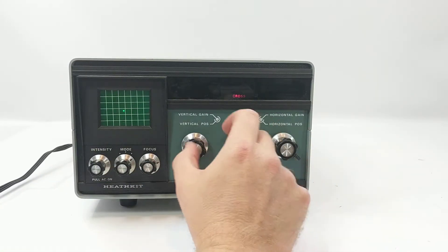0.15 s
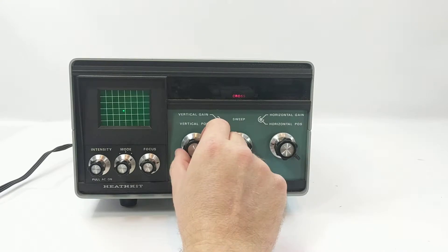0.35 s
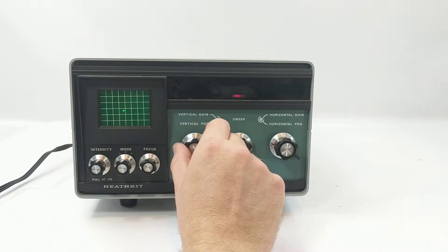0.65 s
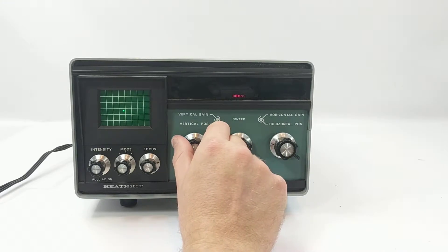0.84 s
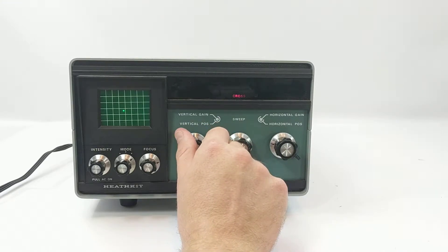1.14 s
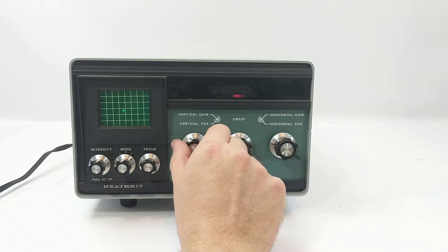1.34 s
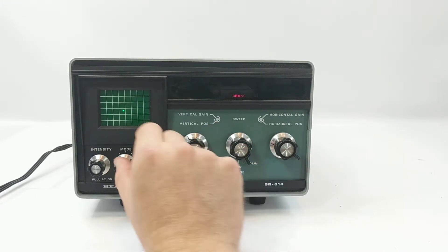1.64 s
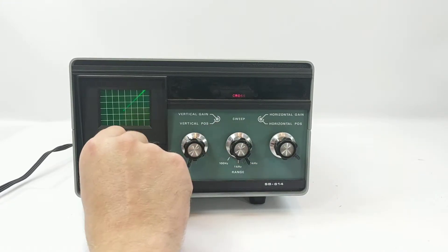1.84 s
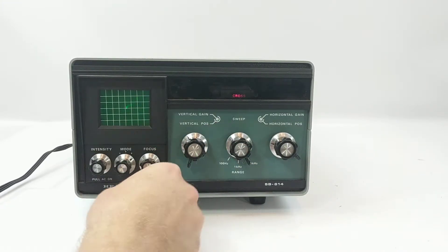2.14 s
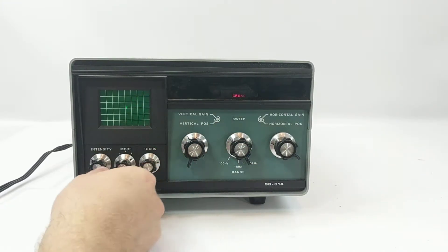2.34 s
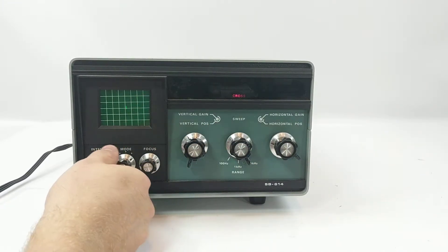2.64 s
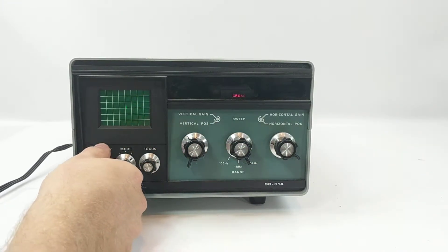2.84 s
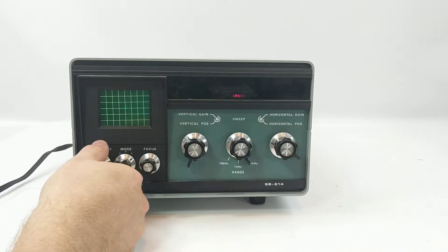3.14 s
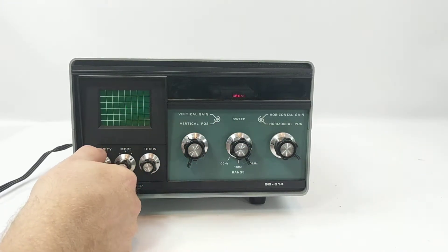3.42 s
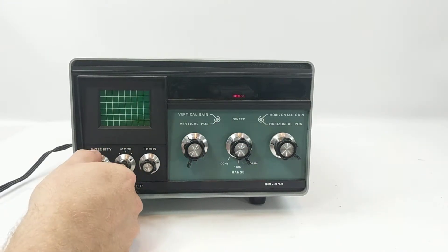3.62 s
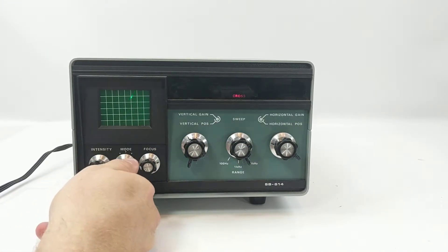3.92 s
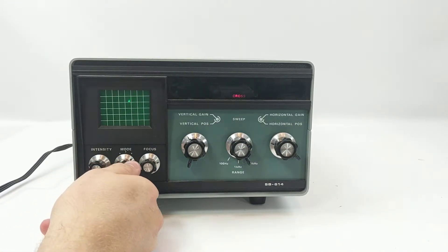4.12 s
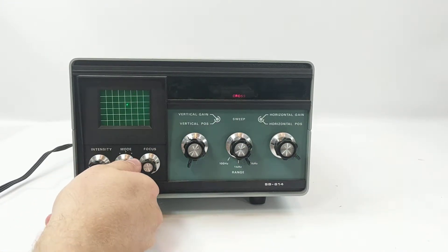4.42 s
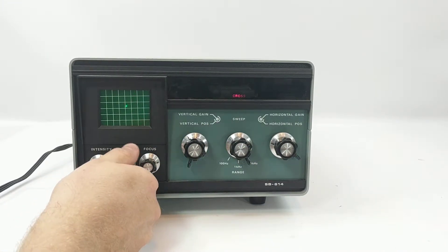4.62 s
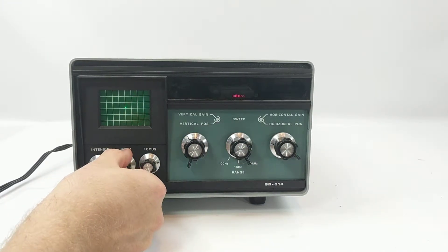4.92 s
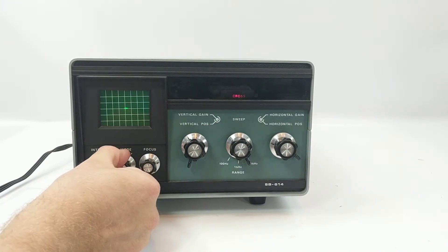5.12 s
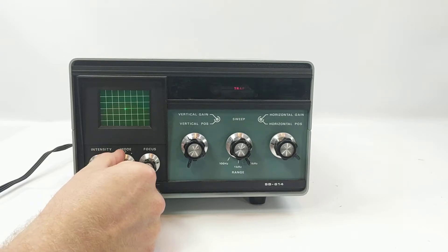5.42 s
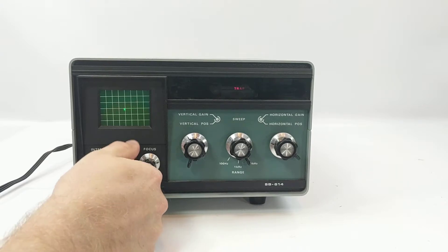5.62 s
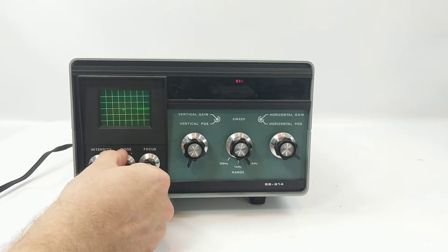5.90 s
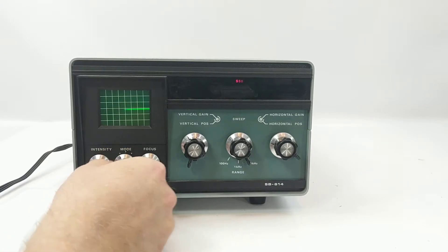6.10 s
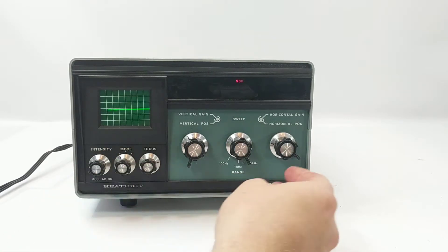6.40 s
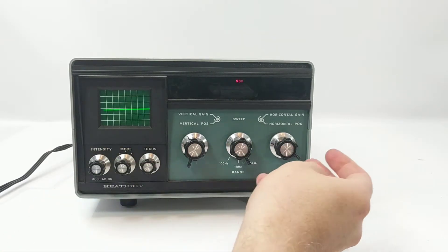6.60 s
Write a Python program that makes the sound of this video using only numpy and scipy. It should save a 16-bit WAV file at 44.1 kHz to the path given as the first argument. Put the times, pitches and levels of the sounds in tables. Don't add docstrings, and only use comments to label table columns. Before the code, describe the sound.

Close to a phone microphone in a quiet room, a hand works the rotary switches of a steel-cased bench instrument. Light fingertip rubs and tiny knocks lead to a very loud midrange snap, then more taps and a brighter, crisp snap. Two softer, duller clunks follow close together near the end. Each click bounces briefly and rings the case, over low rumble and faint air hiss.

```python
import sys
import numpy as np
from scipy import signal
from scipy.fft import rfft, irfft, next_fast_len
from scipy.io import wavfile
from scipy.ndimage import uniform_filter1d

SR = 44100
rng = np.random.default_rng(int(sys.argv[2]) if len(sys.argv) > 2 else 0)


def elevation(decibels):
    levels = np.asarray(decibels, float)
    return 10 ** (levels / 20)


def file_out(sig):
    cols = np.atleast_2d(sig).T
    lim = np.clip(cols, -1, 1)
    pcm = np.round(lim * 32767).astype(np.int16)
    wavfile.write(sys.argv[1], SR, pcm)


N = 297895

# f/Hz, density/(dB per Hz)
RUB = [(300, -22.5), (1000, -4), (2500, -3), (3800, 3), (6500, -7.5), (8800, -9.5), (11000, -5),
       (15500, -14.5), (16200, -34)]


def curve(hz, table, column=1):
    table = np.array(table, float)
    return np.interp(np.log(np.maximum(hz, 1)), np.log(table[:, 0]), table[:, column])


def unit(x):
    return x / np.sqrt(np.mean(x ** 2))


def coloured(table, size):
    hz = np.arange(size // 2 + 1) * SR / size
    white = rfft(rng.standard_normal(size))
    return unit(irfft(white * elevation(curve(hz, table)), size))


def steady_noise(table):
    return coloured(table, next_fast_len(N))[:N]


def walk(rate):
    k = int(SR / rate)
    held = np.repeat(rng.standard_normal(N // k + 1), k)[:N]
    return unit(uniform_filter1d(uniform_filter1d(held, k), k))


def fade(t, t60):
    return elevation(-60 * t / t60)


def modes(table, t, rise_s, spread=1):
    hz, db, t60 = np.array(table, float).T[:, :, None]
    phase = 2 * np.pi * (hz * t + spread * rng.random((len(hz), 1)))
    ringing = elevation(db) * fade(t, np.clip(t60, .02, .33)) * np.sin(phase)
    return ringing.sum(0) * (1 - np.exp(-t / rise_s))


def clatter(colour, t, share, echo_db):
    # f/Hz, ring t60/s, room t60/s, room level/dB
    decays = [(200, 0.067, 0.53, -4.5), (500, 0.082, 0.41, -11.5), (980, 0.05, 0.24, -13.5),
              (2000, 0.055, 0.21, -14), (5030, 0.06, 0.21, -12.5), (12000, 0.042, 0.14, -12.5)]
    bands_hz = 130 * 2 ** (np.arange(15) / 2)
    hz = np.arange(len(t) // 2 + 1) * SR / len(t)
    place = 2 * np.log2(np.maximum(hz, 1) / bands_hz[:, None])
    bands = irfft(rfft(coloured(colour, len(t))) * np.clip(1 - abs(place), 0, 1), len(t))
    ring_t60, room_t60, room_db = (curve(bands_hz, decays, column=c)[:, None] for c in (1, 2, 3))
    rise = 1 - np.exp(-t * bands_hz[:, None] / 1.3)
    room = elevation(room_db + echo_db) * fade(t, room_t60) * (1 - np.exp(-t / 0.024))
    return (bands * rise * (fade(t, share * ring_t60) + room)).sum(0)


def add(out, x, s):
    i = int(s * SR)
    out[i:i + len(x)] += x[:len(out) - i]


def room_air():
    # f/Hz, density/(dB per Hz)
    air_colour = [(40, -27), (75, 4), (125, 3), (155, -5.5), (300, -10), (390, -8.5), (480, -4.5),
                  (630, -10.5), (2500, -21.5), (3800, -18), (6300, -26.5), (8800, -32.5), (12000, -25),
                  (15800, -28.5)]
    return elevation(-68 + 0.35 * walk(3.9)) * steady_noise(air_colour)


def rumble():
    # f/Hz, density/(dB per Hz)
    rumble_colour = [(20, -23.5), (33, -10.5), (45, 2.5), (58, 1.5), (75, -13), (100, -46)]
    swells = [
        (.28, 0.23, -73),
        (.85, .4, -81),
        (1.3, 0.37, -80),
        (1.852, 0.32, -75.5),
        (2.35, 0.92, -79),
        (3.6, .4, -74),
        (4.12, 0.93, -70.5),
        (4.852, 0.71, -73),
        (5.7, 0.27, -76),
        (6.6, .4, -77.5),
    ]
    t = np.arange(N) / SR
    swell = 0
    for centre, length, db in swells:
        swell = swell + elevation(db) * np.cos(np.pi * np.clip((t - centre) / length, -.5, .5)) ** 2
    return (elevation(-78.5 + 1.5 * walk(3.2)) + swell) * steady_noise(rumble_colour)


def stir():
    return elevation(-84 + 4.5 * walk(2.5)) * steady_noise(RUB)


def hum():
    return elevation(-84) * steady_noise([(325, -38.5), (336, -1.5), (352, 0.5), (363, -40.5)])


def supply_whines():
    # t/s, f/Hz
    whine_path = [(0, 6130), (1.5, 6100), (2.1, 6040), (3.3, 5870), (4.5, 5830), (5.8, 5860), (5.95, 5830),
                  (6.1, 6000), (6.75, 6060)]
    lower_hz = np.interp(np.arange(N) / SR, *np.transpose(whine_path)) + 20 * walk(100)
    upper_hz = 11650 + 45 * walk(200)
    lower = elevation(-86 + 1.6 * walk(70)) * np.sin(2 * np.pi * np.cumsum(lower_hz) / SR)
    upper = elevation(-86.5 + 2.5 * walk(70)) * np.sin(2 * np.pi * np.cumsum(upper_hz) / SR)
    return lower + upper


def slides(out):
    strokes = [(.0, 0.12, -74.5, 9), (0.124, 0.16, -74.5, -20), (0.699, 0.13, -75, 21),
               (1.616, 0.077, -73, 11), (1.679, 0.048, -64, 14), (2.068, 0.069, -77.5, 1.1),
               (1.929, .36, -77, 17), (3.63, 0.036, -67, 16), (3.842, 0.06, -72.5, -6.5),
               (4.406, 0.16, -75, -0.5), (4.599, 0.045, -78, -2.5), (5.094, 0.1, -73, 14),
               (5.199, 0.29, -72.5, 2), (5.719, 0.29, -71, 24), (5.895, 0.13, -77, 12),
               (5.988, 0.085, -72, -1), (6.045, 0.047, -68, -25), (6.049, 0.047, -78, 22),
               (6.119, 0.22, -75.5, -7), (6.448, 0.29, -77, -7.5)]
    grip_dulls = 0.13
    grain = elevation(3.3 * walk(250))
    for s, length, db, low_db in strokes:
        size = int(length * SR)
        colour = [(hz, level + low_db * (hz < 2000) - grip_dulls * low_db * (hz > 9000))
                  for hz, level in RUB]
        hiss = grain[int(s * SR):][:size] * coloured(colour, 16384)[:size]
        add(out, elevation(db) * np.hanning(size) ** 0.25 * hiss, s)


def knocks(out, t):
    # t/s, peak level/dB, part struck (0 case, 1 panel, 2 knob, 3 nail), focus/(dB per part squared)
    touches = [(0.054, -61, 0.45, 16), (0.266, -57.5, .1, 22), (0.507, -75, 2.9, 5), (0.586, -65.5, 2.7, 8),
               (0.667, -71, 2.8, 4), (1.273, -71, .05, 6), (1.671, -63, 1.4, 2.5), (1.7, -59.5, 1.05, 4.5),
               (2.552, -52, 0.28, 13), (2.589, -61.5, 1.65, 5), (2.711, -50, 1.2, 4.5),
               (2.8335, -51.5, 0.34, 11), (2.89, -67.5, .1, 9), (3.233, -69, 2.5, 4),
               (3.389, -43, 0.53, 19), (3.408, -49.5, 1.22, 22.5), (3.641, -59, 0.64, 10),
               (4.677, -62.5, 2.34, 2.5), (4.68, -60, 1.05, 19), (4.777, -62, 1.03, 22),
               (5.557, -63, .05, 20), (4.895, -68, .05, 5), (5.556, -58, 1.73, 16), (5.759, -70, .45, 7),
               (5.952, -70, .1, 3), (5.992, -68, 1.4, 4), (6.007, -65, 1.8, 2)]
    # f/Hz, level/dB, t60/s
    case_modes = np.array([(356, -10, 0.18), (420, -3.5, 0.11), (486, 3, 0.11), (625, -9, 0.1),
                           (782, -8, 0.09), (883, -5, 0.11), (1014, -3.5, .08), (1130, 6, 0.045),
                           (1480, -5.5, 0.042), (1770, -7, 0.032), (2154, -8, 0.039), (2624, -3, .03),
                           (3500, -4, 0.038), (4290, -3, .03)])
    case_hz, part_octaves = 516, 1.4
    rattle_db = -45
    mode_part = np.log2(case_modes[:, 0] / case_hz) / part_octaves
    for s, db, part, focus_db in touches:
        answer_db = np.maximum(-focus_db * (np.arange(4) - part) ** 2, rattle_db)
        case_db, panel_db, knob_db, tick_db = answer_db
        between_db = -focus_db * (1.5 - part) ** 2
        colour = [(200, case_db - 33), (450, case_db - 5), (1350, panel_db - 8), (2300, between_db - 9),
                  (3800, knob_db - 9.5), (5500, (knob_db + tick_db) / 2 - 14.5), (7500, tick_db - 17),
                  (10500, tick_db - 14), (15800, tick_db - 20)]
        contact = coloured(colour, len(t)) * fade(t, 0.0053)
        tick = elevation(-1) * clatter(colour, t, 1.1, 5) + elevation(-3) * contact
        mode_db = np.maximum(-focus_db * (mode_part - part) ** 2, rattle_db) + 1
        mode_db = mode_db + 2.5 * rng.standard_normal(len(case_modes))
        struck = case_modes + mode_db[:, None] * [0, 1, 0]
        ring = modes(struck, t, rise_s=0.0011, spread=.3)
        add(out, elevation(db) * (tick * elevation(max(answer_db)) + ring), s - .0002)


def snaps(out, t):
    snap_s = [
        1.8279,
        3.4835,
        5.3168,
        5.8588,
    ]
    strengths = [
        (-15.3, -66.5, 0.029, -43.5, 1.06),
        (-19, -54.5, 0.0085, -46, 1.01),
        (-32, -54, 0.0061, -35.5, 0.85),
        (-29.5, -55, 0.01, -38.5, 1.05),
    ]
    # f/Hz, density/(dB per Hz)
    colours = [
        [(150, -30.5), (425, -11), (1010, -2.5), (1280, -5.5), (2400, -5), (2760, -17.5), (3560, -15),
         (6300, -13), (15300, -21), (16500, -29.5)],
        [(88, -43.5), (150, -21), (1440, 3.5), (1900, 0.5), (2450, 6.5), (2920, -7), (3560, 4.5), (4870, -4.5),
         (13600, 0), (16500, -13)],
        [(88, -13), (150, -5), (250, -12), (508, -4.5), (1690, -12.5), (2050, -9.5), (4000, -23.5),
         (8130, -13.5), (14100, -27), (16500, -26)],
        [(150, -8), (271, -22), (498, -2), (738, -10.5), (1120, -9), (1820, -11), (4200, -19), (7660, -12.5),
         (15300, -28), (16500, -44)],
    ]
    # delay/s, level/dB
    bounces = [
        [(.0023, -1.5), (.0042, 0.5)],
        [(.0003, 1.5), (.0013, -2.5), (.005, -7)],
        [(.0035, -18), (.006, -1)],
        [(.0022, 1), (.0065, 1.5)],
    ]
    # f/Hz, level/dB, t60/s
    wide_case = [(360, -12.5, .14), (420, -7, .09), (483, -8.5, 0.15), (620, -11.5, 0.063),
                 (742, -16, 0.23), (932, -5.5, 0.063), (1021.3, -13, 0.36), (1033, 6.5, .045),
                 (1168, -1.9, 0.077)]
    wide_shaft = [(1400, -16, 0.24), (1480, -5, 0.089), (1656, -9.5, 0.067), (1913, -5.5, 0.036),
                  (2090, 4, .05), (2412, 5, 0.05), (3465, -8.5, .05), (3884, -11, .07), (6390, -2, 0.035)]
    bright_ring = [(475, -10.5, 0.16), (1050, -2, .06), (1130, -1.5, .045), (1275, -2, 0.042),
                   (1407, -0.5, 0.067), (1424, -10.5, 0.21), (2100, -7, 0.094), (2530, 0, 0.065),
                   (3500, 1.5, 0.046), (3614, -9, 0.087), (3940, -3.5, 0.08), (6040, 4, 0.031),
                   (10600, -25, .05)]
    soft_ring = [(478, 1, 0.14), (565, -10, 0.066), (743, -9.5, 0.28), (910, -12, .06), (1180, -10.5, 0.13),
                 (1550, -15, .08), (2110, -3, 0.075), (2363, -18.5, 0.25), (5200, -7, 0.062),
                 (8200, -6, 0.045), (14000, -1, .03)]
    dull_ring = [(478, 3, 0.11), (673, -4.5, 0.16), (745, -8.5, 0.2), (1080, -11, 0.16), (1710, -3, 0.057),
                 (1964, -1.5, 0.061), (2360, -10, 0.11), (4050, -21, 0.052), (6000, 6.5, 0.027),
                 (7800, -2.5, 0.085), (8900, 3, 0.041)]
    rings = [wide_case + wide_shaft, bright_ring, soft_ring, dull_ring]
    table_modes = [(101, -5.5, .3), (131, -9, 0.19), (75, -6.5, .2)]
    thin = signal.butter(2, 260, "high", fs=SR, output="sos")
    for s, strength, colour, ring, rebounds in zip(snap_s, strengths, colours, rings, bounces):
        db, creep_db, lead, thump_db, share = strength
        blow = elevation(-3.5) * clatter(colour, t, share, echo_db=-0.1)
        blow += elevation(-11) * modes(ring, t, rise_s=0.0012)
        for delay, blow_db in [(0.0009, 0)] + rebounds:
            contact = coloured(colour, 2048) * fade(t[:2048], 0.0032)
            add(blow, elevation(blow_db - 3) * contact, delay)
        add(out, elevation(db) * signal.sosfilt(thin, blow), s)
        creep = coloured(RUB, len(t)) * (t < lead) * np.sqrt(t / lead)
        add(out, elevation(creep_db) * creep, s - lead)
        add(out, elevation(thump_db) * modes(table_modes, t, rise_s=0.022), s)


def scene():
    out = room_air() + rumble() + stir() + hum() + supply_whines()
    t = np.arange(13500) / SR
    slides(out)
    knocks(out, t[:8192])
    snaps(out, t)
    return out[None]


def top_cut(x):
    return signal.sosfilt(signal.butter(12, 16810, fs=SR, output="sos"), x)


def record(dry):
    hz = np.arange(N // 2 + 1) * SR / N
    top = irfft(rfft(dry) * np.clip((hz - 15700) / 300, 0, 1), N)
    loud = uniform_filter1d(top ** 2, size=256) > elevation(2 * -72)
    gated = top * uniform_filter1d(1. * loud, size=128)
    kept = irfft(rfft(gated) * np.clip((16800 - hz) / 900, 0, 1), N)
    return top_cut(dry - top + kept)


dry = scene()
out = record(dry)
file_out(out)
```